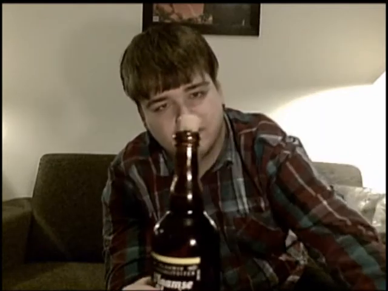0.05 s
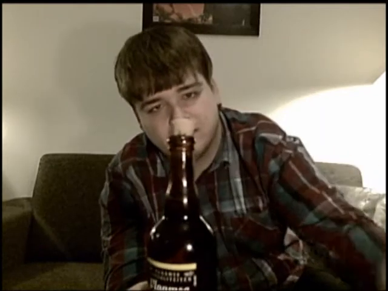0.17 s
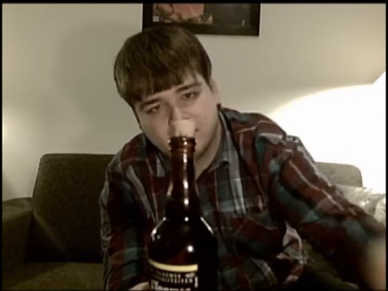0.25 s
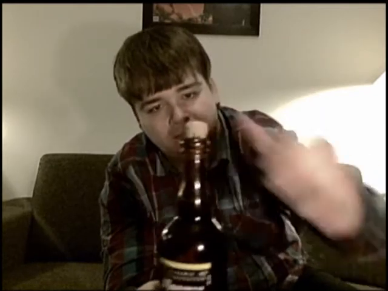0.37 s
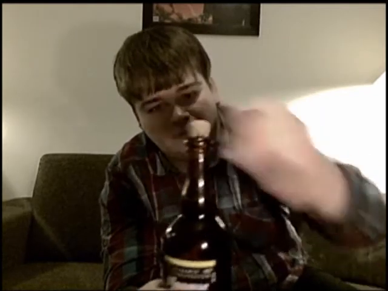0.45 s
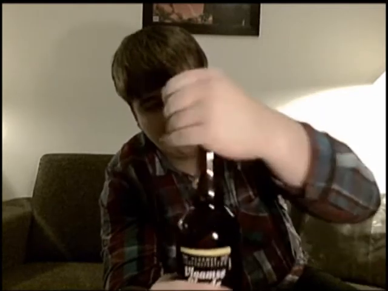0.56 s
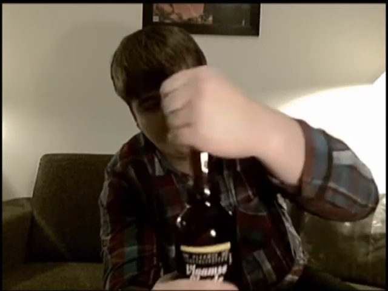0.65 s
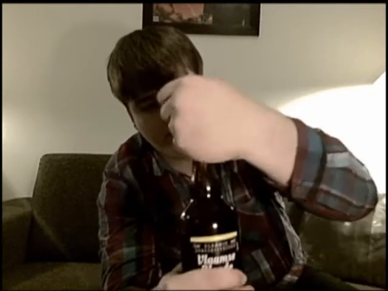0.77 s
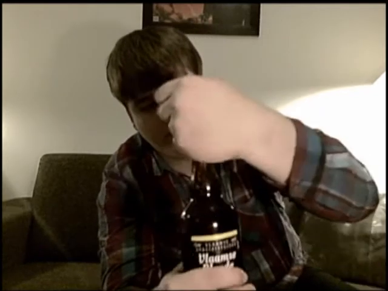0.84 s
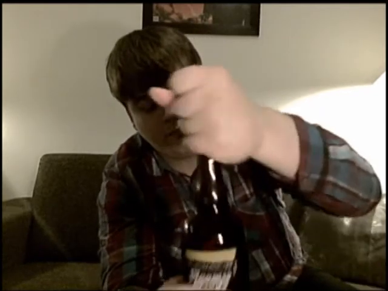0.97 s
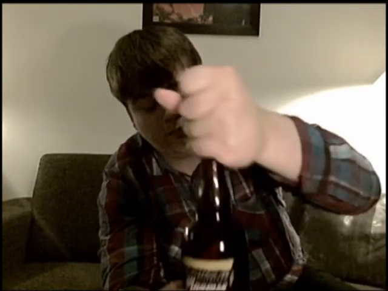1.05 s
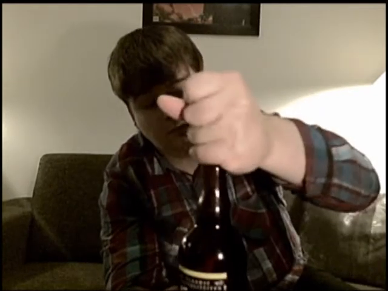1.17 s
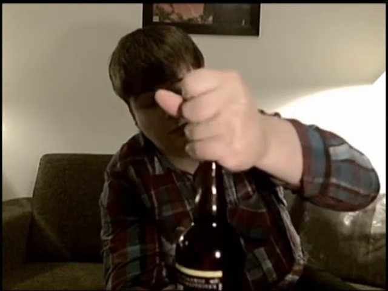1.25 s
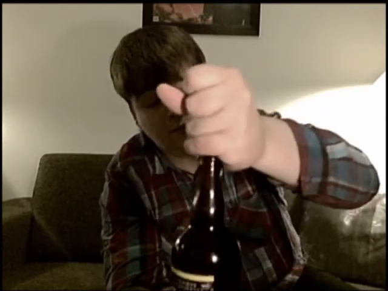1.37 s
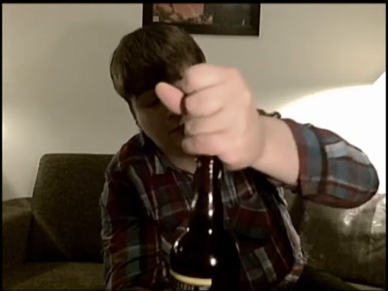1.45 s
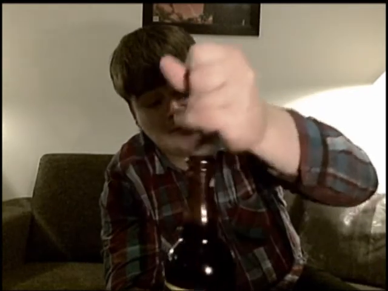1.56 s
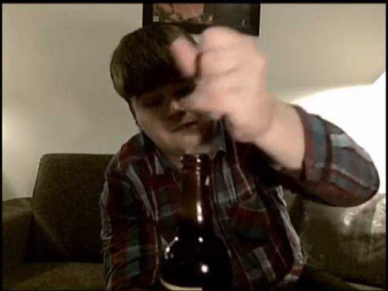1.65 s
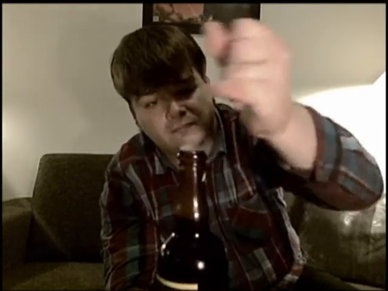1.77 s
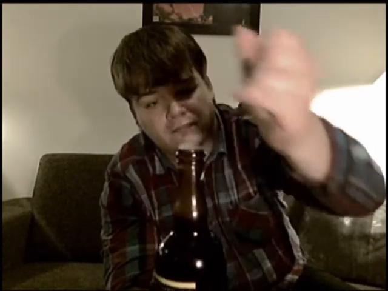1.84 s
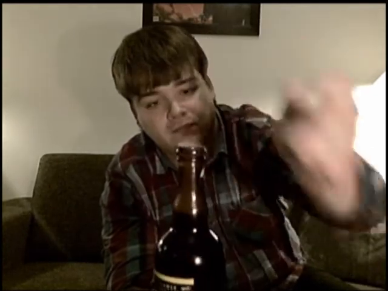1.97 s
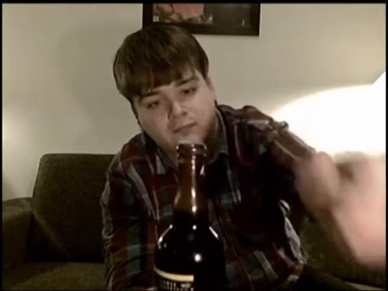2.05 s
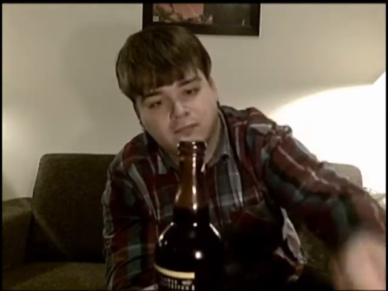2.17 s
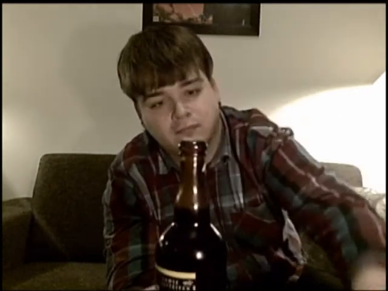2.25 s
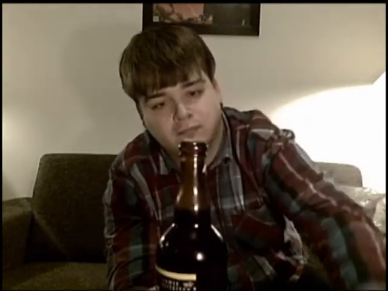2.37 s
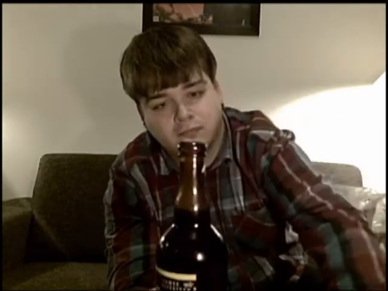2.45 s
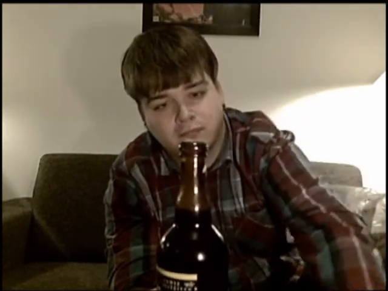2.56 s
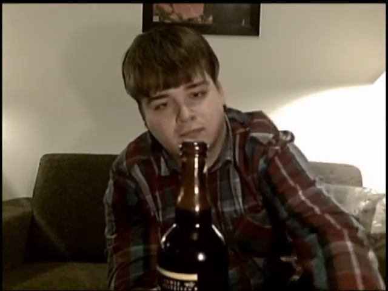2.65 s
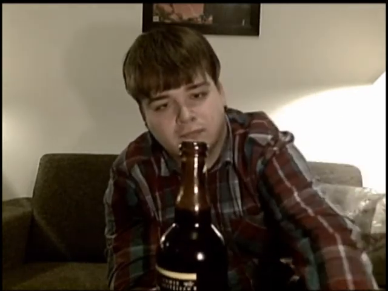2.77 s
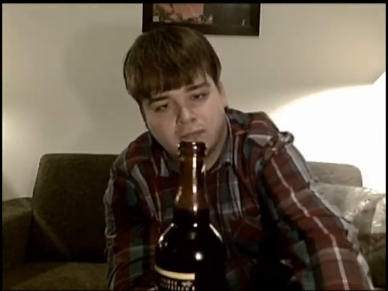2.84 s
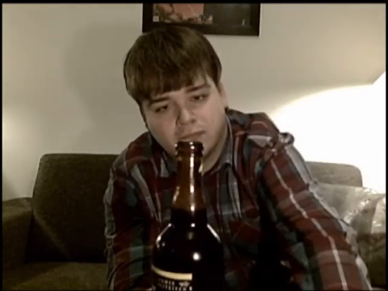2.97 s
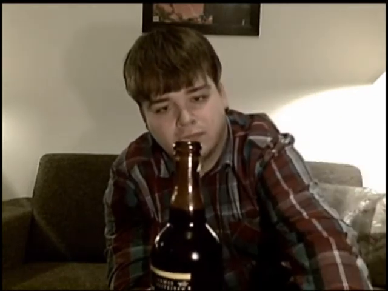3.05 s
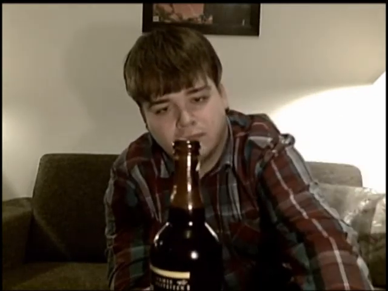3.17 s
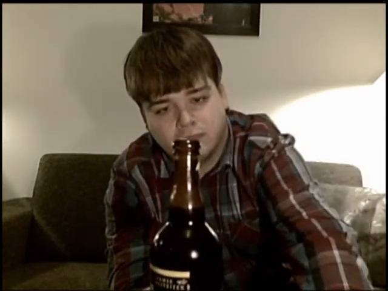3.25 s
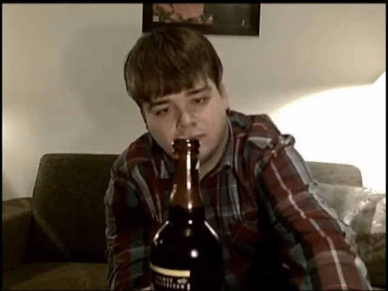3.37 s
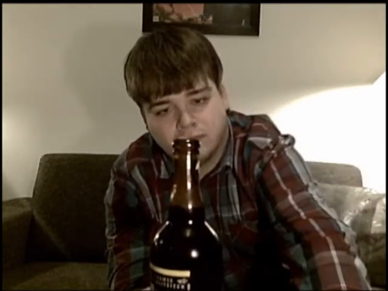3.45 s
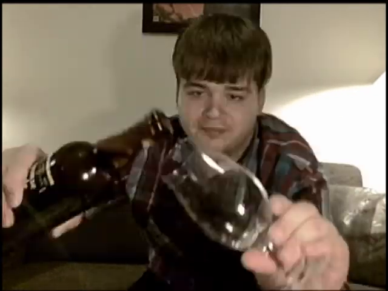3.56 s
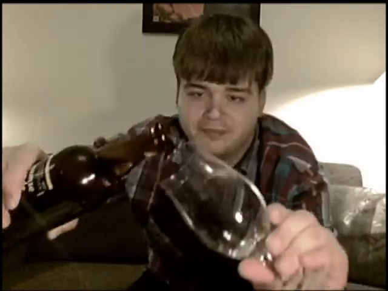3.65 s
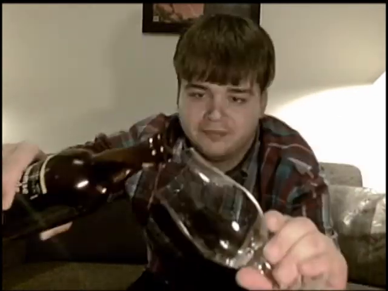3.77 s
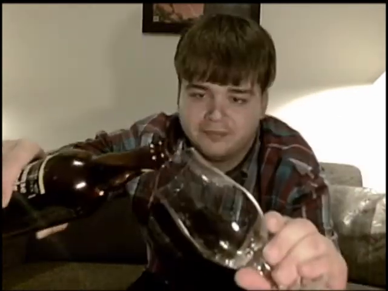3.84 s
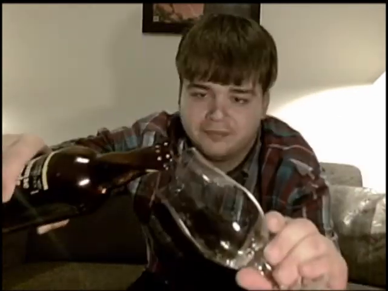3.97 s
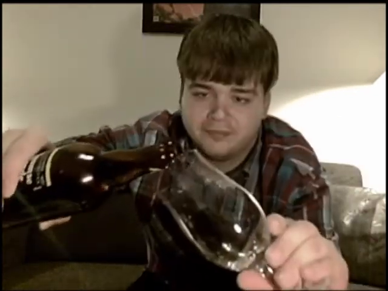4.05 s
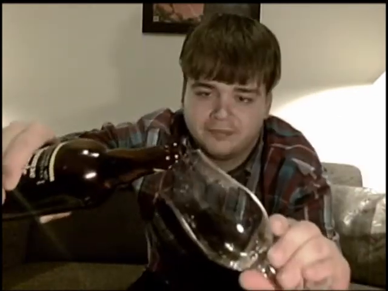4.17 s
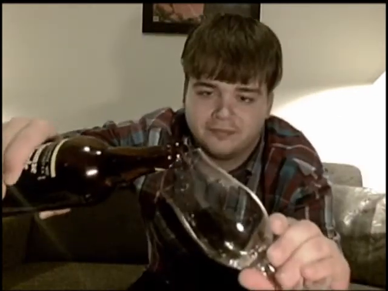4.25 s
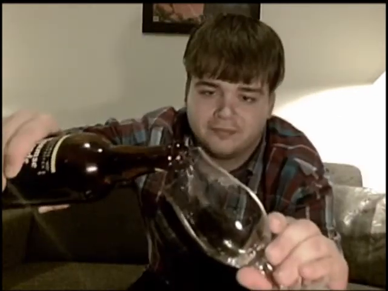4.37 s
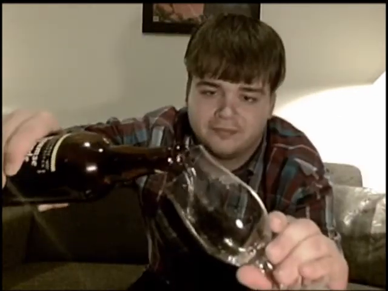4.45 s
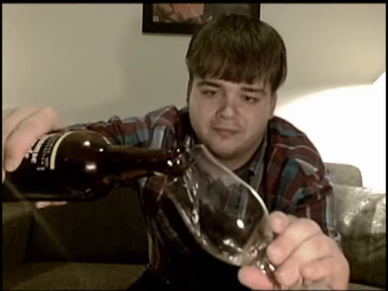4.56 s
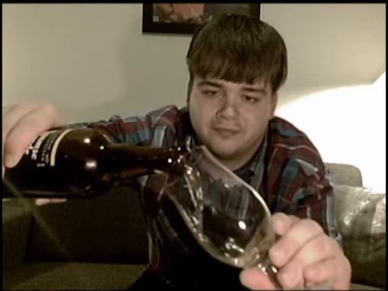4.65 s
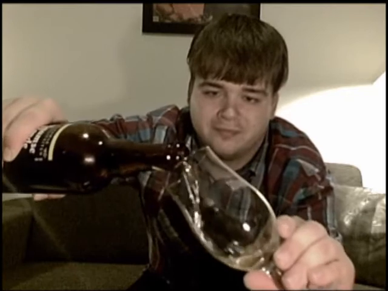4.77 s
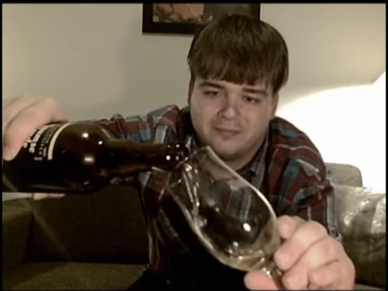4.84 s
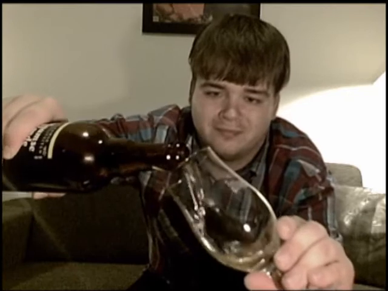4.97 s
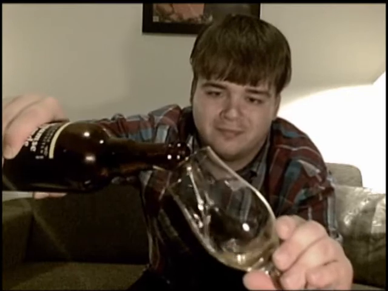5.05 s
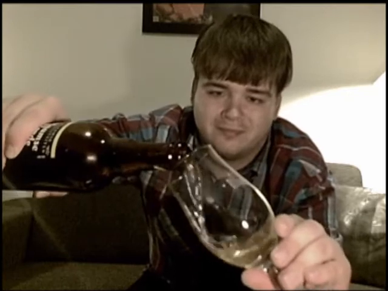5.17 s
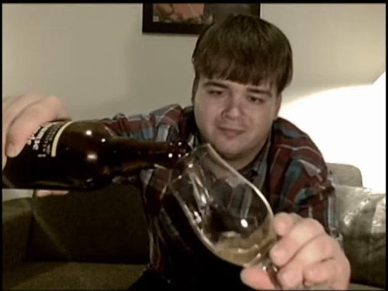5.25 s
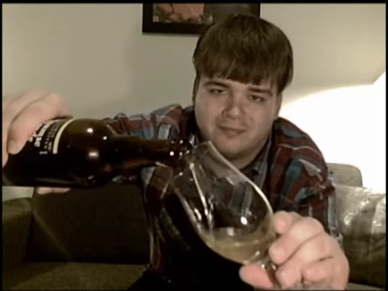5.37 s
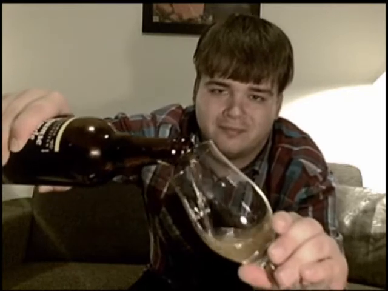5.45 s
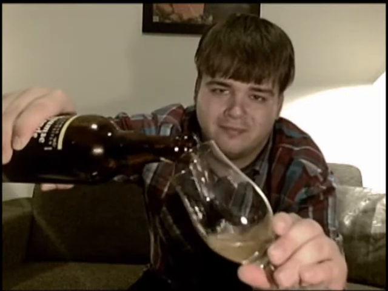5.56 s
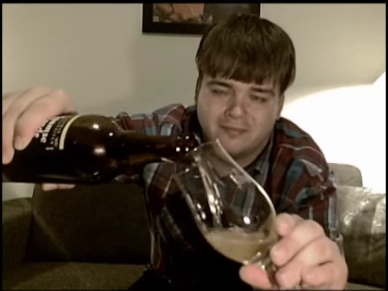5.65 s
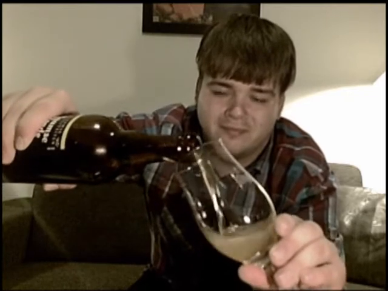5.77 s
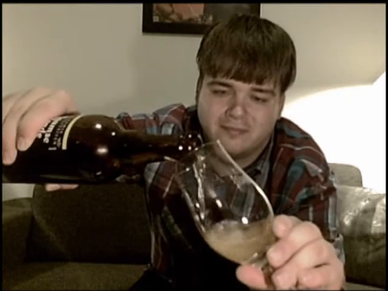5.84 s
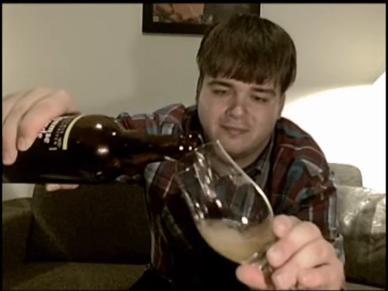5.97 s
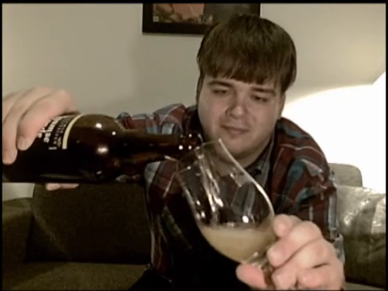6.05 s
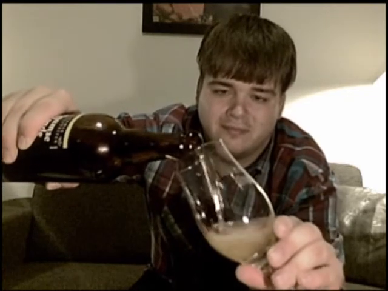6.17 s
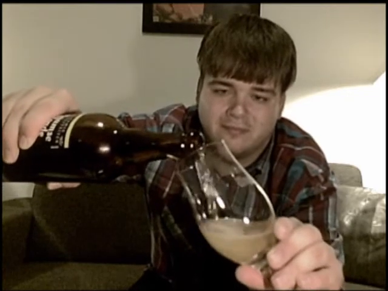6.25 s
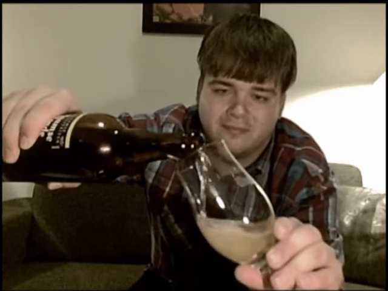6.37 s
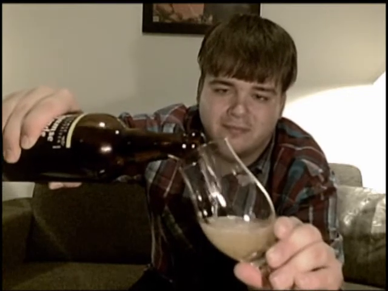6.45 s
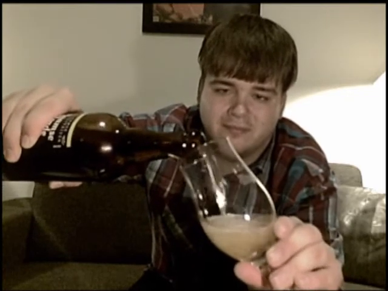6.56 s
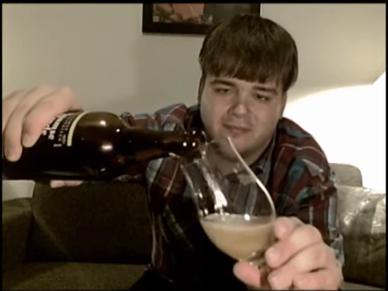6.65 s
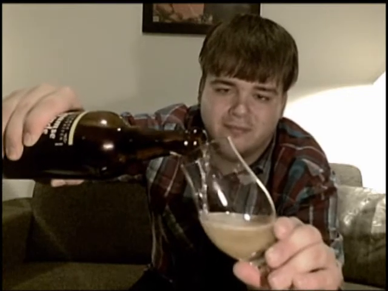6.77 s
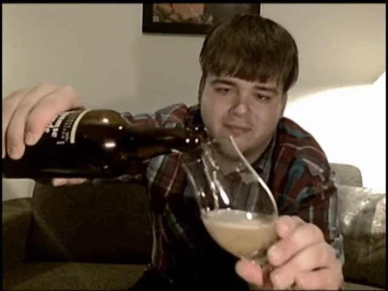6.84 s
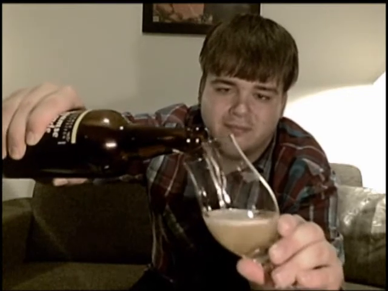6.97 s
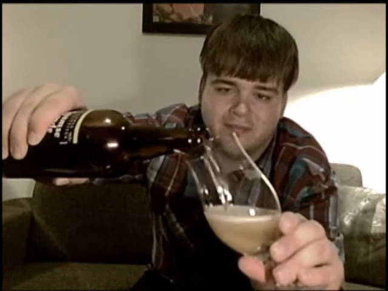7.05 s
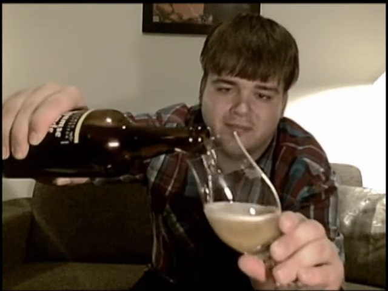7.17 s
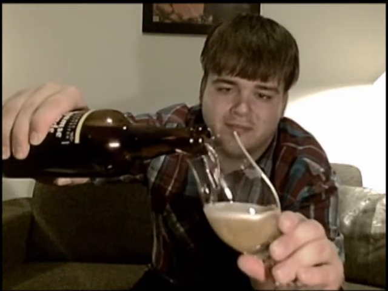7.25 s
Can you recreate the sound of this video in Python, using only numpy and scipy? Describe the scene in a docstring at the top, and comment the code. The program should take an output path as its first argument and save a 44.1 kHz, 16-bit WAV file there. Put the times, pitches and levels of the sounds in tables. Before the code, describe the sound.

Steady dull hiss and a faint fan tone run throughout. A rapid cluster of woody knocks fades away, a cork slips with a tight snap, and a very loud, distorted pop fills the room with a short hollow tail. After near silence, quiet gulps climb gently in pitch among watery plinks and delicate fizz, all close to the microphone in a living room.

```python
"""A corked beer bottle is opened close to a small microphone in a living room, then poured into a tilted glass.
The pop is one pressure swing, a noise crack and a ringing neck; it overloads the input.
Before it: struck table modes for the knocks, stiffer modes for one slip of the cork.
After it: gliding sine gulps, ringing drips and foam. Fan whine and coloured hiss run throughout."""
import sys
import numpy as np
from scipy import signal
from scipy.fft import rfft, irfft
from scipy.io import wavfile

SR = 44100
rng = np.random.default_rng(int(sys.argv[2]) if len(sys.argv) > 2 else 0)


def transcribe(signal):
    """Save signal, clipped to [-1, 1], as a 16-bit WAV file at the path in sys.argv[1]."""
    frames = np.atleast_2d(signal).T
    limited = np.clip(frames, -1, 1)
    pcm = np.round(limited * 32767).astype(np.int16)
    wavfile.write(sys.argv[1], SR, pcm)


N = 322371  # length in samples

# fan tones: tone_hz, level_db
FAN_TONES = [(247.6, -63), (742.9, -71), (1082, -89), (1114, -62), (1669, -67), (2229, -78)]
# hiss spectrum, relative: freq_hz, density_db
HISS_SPECTRUM = [(12, -36.5), (20, 0), (65, -9), (127, -8), (205, -10.5), (241, -9.5), (360, -12),
                 (510, -9.5), (1050, -15), (1140, -15.5), (1300, -14), (1700, -21.5), (2340, -23),
                 (6310, -27), (12000, -58), (15600, -98.5), (22000, -120)]
# knocks on the table: start_s, level_db, upper_modes_db, tick_db
KNOCK_EVENTS = [(0.2266, -19.5, -15, -6.5), (0.2853, -23, -1, -16), (0.3346, -27.5, 1, -9.5),
                (.4018, -35.5, 3, -0.5), (0.4998, -38, -5, -5.5), (0.5248, -30.5, -20, -20),
                (.5455, -38.5, -4, -18), (.826, -41, -12, -22)]
# lower table modes: mode_hz, level_db, t60_s
TABLE_MODES = [(145, -13.5, 0.061), (210, -10.5, 0.056), (330, -9.5, 0.047), (409, -6.5, 0.03),
               (829, -2, 0.053), (878, -6, 0.037)]
# upper table modes: mode_hz, level_db, t60_s
TABLE_UPPER_MODES = [(1340, 1, 0.019), (1445, -5, 0.039)]
# contact tick spectrum: freq_hz, level_db
TICK_SPECTRUM = [(300, 0), (1800, 1), (3000, 0.5), (4500, -0.5), (5800, 5.5), (8000, -6.5), (10000, -22)]
# modes shaken by the slipping cork: mode_hz, level_db, t60_s
SLIP_MODES = [(565.6, -9.5, 0.014), (924, -5, 0.021), (1178, -6, .025), (1417, -5, .02), (2260, 0, 0.01),
              (2380, -9, 0.017), (4075, -8, 0.028), (5220, -10, 0.024)]
# cork snap spectrum: freq_hz, level_db
SNAP_SPECTRUM = [(100, -25), (400, -3), (1300, 9), (2500, 2), (3600, 3.5), (5000, -0.5), (7000, -13.5),
                 (10000, -13)]
# pressure swing spectrum as the cork clears the lip: freq_hz, level_db
THUMP_SPECTRUM = [(30, -39), (70, -17.5), (110, -4), (175, 5.5), (260, 2), (400, 1.5), (500, -4.5),
                  (700, 0.5), (900, -23), (2000, -21), (5000, -45.5)]
# air modes of the opened neck: mode_hz, level_db, t60_s
NECK_MODES = [(567, 14, .055), (601.7, 10, 0.23), (671.5, -9, 0.17), (733.3, -14, 0.19),
              (1162, -16.5, 0.16), (1365, -12.5, 0.098), (1703, -12.5, 0.065)]
# escaping gas spectrum: freq_hz, level_db
GAS_SPECTRUM = [(150, -10.5), (500, -7.5), (1000, 1), (1700, 2.5), (3000, -3.5), (4000, -2), (5000, -4),
                (6300, 1), (8000, -8.5), (10000, -21.5)]
# loose bubbles rolling through the bottle: start_s, pitch_hz, level_db
LOOSE_BUBBLES = [(3.786, 523, -42.5), (3.828, 823, -46.5), (5.184, 220, -33), (6.024, 183, -33.5),
                 (7.052, 224, -34.5)]
# clear air gulps through the neck: start_s, level_db, t60_s
CLEAR_GULPS = [(4.370, -42, 0.035), (4.491, -38.5, 0.055), (4.660, -30.5, 0.053), (4.995, -31.5, 0.15),
               (5.741, -40, 0.078), (5.962, -38, .04), (6.163, -35, 0.054), (6.237, -27, 0.045),
               (6.325, -38, 0.031), (6.366, -38, .045), (6.382, -36, 0.06), (6.409, -38, 0.072),
               (6.564, -26, .042), (6.615, -25, .042), (6.976, -36, 0.044)]
# small bubbles bursting at the lip and in the glass: start_s, pitch_hz, level_db, splash_db
DRIP_EVENTS = [(4.9946, 1230, -24, -14), (5.021, 2240, -30.5, -4), (5.3373, 1390, -38.5, 1),
               (5.3415, 2320, -30, -11), (5.7400, 2474, -37, -1), (6.163, 1500, -27, -4),
               (6.577, 2360, -28, -1.5), (7.017, 2470, -44.5, -4)]
# drip splash spectrum: freq_hz, level_db
SPLASH_SPECTRUM = [(200, -3.5), (700, 7), (1400, -0.5), (2500, 3.5), (3300, -6.5), (5000, -9.5),
                   (9000, -23.5)]
# foam level curve: time_s, level_db
FOAM_LEVEL = [(5.001, -77), (5.45, -60), (5.75, -65), (5.95, -50.5), (6.1, -60), (7.3, -64)]
# near surfaces: delay_s, gain_db
NEAR_ECHOES = [(.0023, -15), (.0147, -14), (.025, -17)]
# room decay: freq_hz, t60_s
ROOM_DECAY = [(100, 0.4), (300, 0.41), (600, 0.39), (1500, 0.3), (4000, 0.29), (8000, 0.27)]

HISS_DB = -50.5
SLIP_S, SLIP_DB = 1.1478, -22

POP_S = 1.6731
CRACK_DELAY_S, RING_DELAY_S = 0.001, 0.0037  # after POP_S
THUMP_DB, CRACK_DB, GAS_DB = 31, -0.5, -15.5
CRACK_T60_S, GAS_T60_S = 0.029, 0.11

POUR_S = 3.75  # the bottle is tipped
GLUG_HZ, GLUG_CLIMB_HZ_PER_S = 568, 52.9
GULP_SWELL_S, GULP_GLIDE_RATIO = 0.0034, 0.1
LOOSE_BUBBLE_T60_S = 0.055
GURGLE_DB, GURGLE_SPREAD_DB = -48, 2
GURGLE_DETUNE, GURGLE_T60_S = 0.093, 0.036  # detune: log-pitch deviation
DRIP_T60_S, SPLASH_T60_S = 0.024, 0.015

MIC_CUTOFF_HZ, TOP_CUTOFF_HZ = 8540, 16000
FULL_SCALE = 0.98
TIME_S = np.arange(int(0.8 * SR)) / SR  # time axis of one event


def undb(db):
    """Decibels to gain."""
    return 10 ** (np.asarray(db) / 20)


def add(track, start_s, sound):
    """Mix a sound into a track at a time."""
    i = int(start_s * SR)
    track[i:i + len(sound)] += sound[:N - i]


def fade(t60_s):
    """Exponential decay, 60 dB down after t60_s."""
    return np.exp(-np.log(1000) * TIME_S / t60_s)


def along(points, freq_hz):
    """Read (freq_hz, value) points on a log-frequency axis."""
    points_hz, values = np.transpose(points)
    return np.interp(np.log(freq_hz + 1), np.log(points_hz), values)


def colour(x, spectrum):
    """Minimum-phase filter of unit energy with the given spectrum."""
    size = 8192
    freq_hz = np.arange(size // 2 + 1) * SR / size
    cepstrum = irfft(np.log(undb(along(spectrum, freq_hz))))
    # fold the cepstrum onto positive time: makes the filter causal
    cepstrum[1:size // 2] *= 2
    cepstrum[size // 2 + 1:] = 0
    response = irfft(np.exp(rfft(cepstrum)))
    response /= np.linalg.norm(response)
    return signal.fftconvolve(x, response)[:len(x)]


def burst(spectrum, t60_s):
    """A dying puff of coloured noise."""
    return colour(rng.standard_normal(len(TIME_S)) * fade(t60_s), spectrum)


def ring(modes, contact_s=0.0002):
    """Struck modes; a softer contact builds them up more slowly."""
    onset = 1 - np.exp(-TIME_S / contact_s)
    tones = sum(undb(level_db) * fade(t60_s) * np.sin(2 * np.pi * mode_hz * TIME_S)
                for mode_hz, level_db, t60_s in modes)
    return onset * tones


def room(x, wet_db, build_s=0.012):
    """Direct sound, near echoes and a diffuse noise tail that decays at its own rate in each octave."""
    size = len(TIME_S)
    spectrum = rfft(rng.standard_normal(size))
    octave = np.log2(np.clip(np.arange(len(spectrum)) * SR / size, 2 ** 6, 2 ** 13))
    tail = np.zeros(size)
    for centre in range(6, 14):  # 64 Hz to 8192 Hz, overlapping triangular bands
        band = irfft(spectrum * np.maximum(1 - abs(octave - centre), 0), size)
        tail += band * fade(along(ROOM_DECAY, 2.0 ** centre))
    tail *= 1 - np.exp(-TIME_S / build_s)
    response = undb(wet_db) * tail / np.linalg.norm(tail)
    response[0] += 1  # direct sound
    for delay_s, gain_db in NEAR_ECHOES:
        response[int(delay_s * SR)] += undb(gain_db)
    return signal.fftconvolve(x, response)[:N]


def background(waver_db=2, wander_hz=0.8):
    """Steady coloured hiss and fan tones that waver gently in level and pitch."""
    time_s = np.arange(N) / SR
    out = undb(HISS_DB) * colour(rng.standard_normal(N), HISS_SPECTRUM)
    knots_s = np.linspace(0, time_s[-1], 30)
    for tone_hz, level_db in FAN_TONES:
        swell = np.interp(time_s, knots_s, rng.standard_normal(len(knots_s)))
        drift = np.interp(time_s, knots_s, rng.standard_normal(len(knots_s)))
        phase = 2 * np.pi * np.cumsum(tone_hz + wander_hz * drift) / SR
        out += np.sqrt(2) * undb(level_db + waver_db * swell) * np.sin(phase)  # level is RMS
    return out


def knocks():
    """Each contact ticks and rings the table top."""
    out = np.zeros(N)
    for start_s, level_db, upper_modes_db, tick_db in KNOCK_EVENTS:
        lower = ring(TABLE_MODES, contact_s=0.0015)
        upper = undb(upper_modes_db) * ring(TABLE_UPPER_MODES, contact_s=0.00053)
        tick = undb(tick_db) * burst(TICK_SPECTRUM, t60_s=0.015)
        add(out, start_s, undb(level_db) * (lower + upper + tick))
    return room(out, wet_db=-1)


def cork_slip(snap_db=-1):
    """The twisted cork lets go of the glass for an instant: short modes and a noise snap."""
    out = np.zeros(N)
    snap = undb(snap_db) * burst(SNAP_SPECTRUM, t60_s=0.022)
    add(out, SLIP_S, undb(SLIP_DB) * (ring(SLIP_MODES) + snap))
    return room(out, wet_db=-6)


def pop():
    """The freed gas gives one big pressure swing, a crack and a short hiss; the air in the neck rings on."""
    thump, neck, gas = np.zeros((3, N))
    swing = -colour(signal.unit_impulse(len(TIME_S)), THUMP_SPECTRUM)
    add(thump, POP_S, undb(THUMP_DB) * swing)
    add(neck, POP_S + RING_DELAY_S, ring(NECK_MODES))
    crack = undb(CRACK_DB) * burst(GAS_SPECTRUM, CRACK_T60_S)
    hiss = undb(GAS_DB) * burst(GAS_SPECTRUM, GAS_T60_S)
    add(gas, POP_S + CRACK_DELAY_S, crack + hiss)
    return room(thump, wet_db=-6) + room(neck, wet_db=-11.5) + room(gas, wet_db=-3.5)


def gulp(pitch_hz, t60_s):
    """One air bubble swells and rings, gliding up a little in pitch."""
    shape = (1 - np.exp(-(TIME_S / GULP_SWELL_S) ** 2)) * fade(t60_s)
    glide_hz = pitch_hz * (1 + GULP_GLIDE_RATIO * (0.5 - fade(t60_s)))
    return shape / shape.max() * np.sin(2 * np.pi * np.cumsum(glide_hz) / SR)


def glug_pitch_hz(time_s):
    """The pitch of the gulps climbs steadily while the beer runs."""
    return GLUG_HZ + GLUG_CLIMB_HZ_PER_S * (time_s - POUR_S)


def glugs(gurgle_count=14):
    """Air enters the bottle: clear gulps, a faint random gurgle among them and a few loose bubbles."""
    out = np.zeros(N)
    for start_s, level_db, t60_s in CLEAR_GULPS:
        add(out, start_s, undb(level_db) * gulp(glug_pitch_hz(start_s), t60_s))
    for start_s, pitch_hz, level_db in LOOSE_BUBBLES:
        add(out, start_s, undb(level_db) * gulp(pitch_hz, LOOSE_BUBBLE_T60_S))
    # one gurgle at a random time in each equal slot of the pour
    slot_s = (N / SR - POUR_S) / gurgle_count
    starts_s = POUR_S + slot_s * (np.arange(gurgle_count) + rng.random(gurgle_count))
    for start_s, (detune, loudness) in zip(starts_s, rng.standard_normal((gurgle_count, 2))):
        pitch_hz = glug_pitch_hz(start_s) * np.exp(GURGLE_DETUNE * detune)
        level_db = GURGLE_DB + GURGLE_SPREAD_DB * loudness
        add(out, start_s, undb(level_db) * gulp(pitch_hz, GURGLE_T60_S))
    return out


def drips():
    """Small bubbles ring briefly and burst with a splash."""
    out = np.zeros(N)
    for start_s, pitch_hz, level_db, splash_db in DRIP_EVENTS:
        bubble = ring([(pitch_hz, 0, DRIP_T60_S)])
        splash = undb(splash_db) * burst(SPLASH_SPECTRUM, SPLASH_T60_S)
        add(out, start_s, undb(level_db) * (bubble + splash))
    return out


def foam(count=260, bubble_hz=3100, log_pitch_spread=0.12, level_spread_db=4, jitter_s=0.0063):
    """Tiny bubbles of nearly one size burst at random as the head rises."""
    out = np.zeros(N)
    times_s, levels_db = np.transpose(FOAM_LEVEL)
    grid_s = np.linspace(times_s[0], times_s[-1], count)
    for time_s, (detune, loudness) in zip(grid_s, rng.standard_normal((count, 2))):
        level_db = np.interp(time_s, times_s, levels_db) + level_spread_db * loudness
        pitch_hz = bubble_hz * np.exp(log_pitch_spread * detune)
        add(out, time_s - jitter_s * rng.random(), ring([(pitch_hz, level_db, 0.012)]))
    return out


def pour():
    """Gulps in the bottle, drips and foam in the glass, all close to the microphone."""
    return room(glugs(), wet_db=-8.5) + room(drips() + foam(), wet_db=-7)


def scene():
    """Everything through a microphone that falls off steeply above its cutoff."""
    air = background() + knocks() + cork_slip() + pop() + pour()
    mic = signal.butter(N=14, Wn=MIC_CUTOFF_HZ, fs=SR, output="sos")
    return signal.sosfilt(mic, air)[None]


def record(dry):
    """The input clips hard on the pop; the very top is cut."""
    clipped = np.clip(dry, -FULL_SCALE, FULL_SCALE)
    top_cut = signal.ellip(8, 0.1, 70, TOP_CUTOFF_HZ, fs=SR, output="sos")  # ripple, stopband in dB
    return signal.sosfilt(top_cut, clipped)


dry = scene()
out = record(dry)
transcribe(out)
```